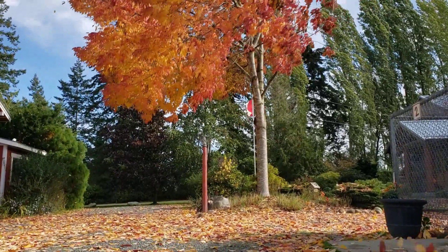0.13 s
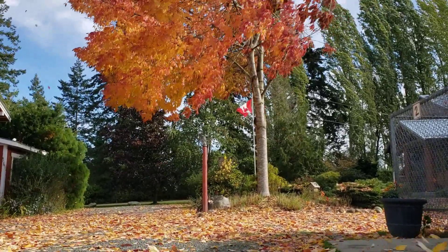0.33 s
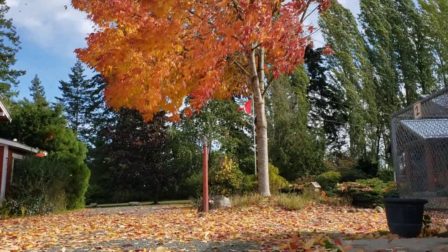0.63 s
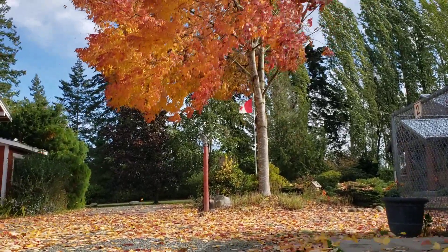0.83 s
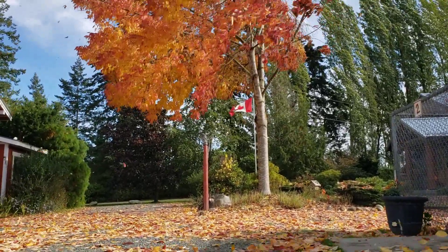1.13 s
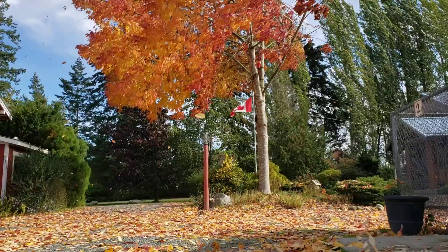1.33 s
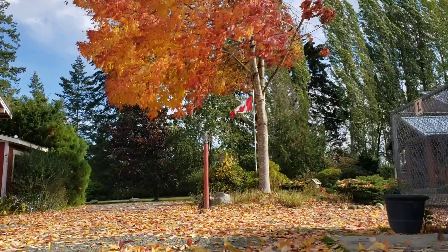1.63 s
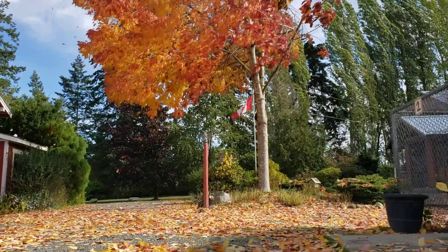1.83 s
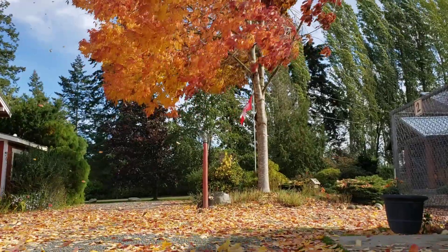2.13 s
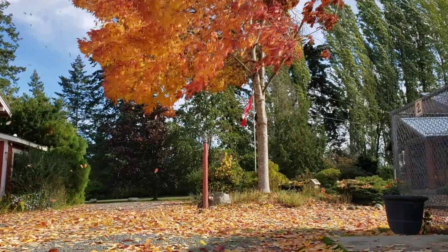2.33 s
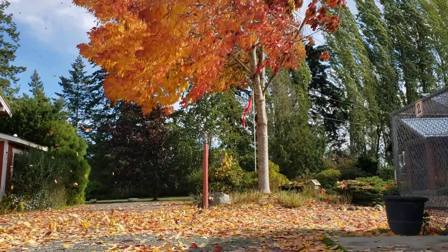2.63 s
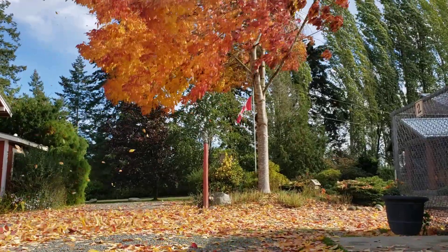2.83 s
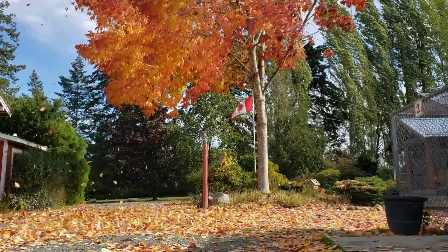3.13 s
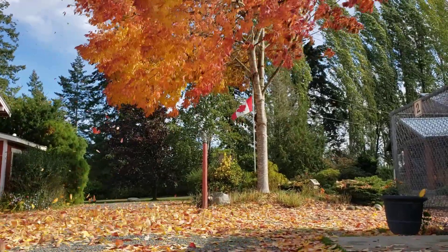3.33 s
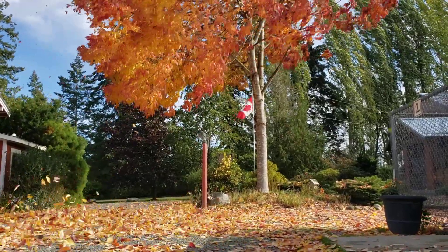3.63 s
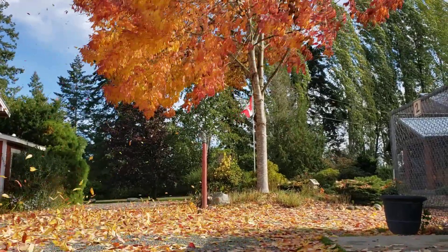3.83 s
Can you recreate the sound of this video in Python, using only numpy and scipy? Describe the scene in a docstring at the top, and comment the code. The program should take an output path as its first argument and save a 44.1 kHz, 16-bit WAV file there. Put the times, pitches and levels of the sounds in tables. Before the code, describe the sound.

Gusty wind buffets the microphone while trees hiss and dry fallen leaves skitter close by

```python
"""Trees hiss and roar, dry leaves skitter close by; wind rumbles, flutters and thumps, then dies away.
Trees: noise for the foliage over low noise for the crowns. Leaves: clumped crackles and single
ticks, both short filtered noise bursts, with a faint scatter from the yard.
Wind on the two microphone ports: low noise per port, brightening eddies and a few large shoves."""
import sys
import numpy as np
from scipy import signal
from scipy.fft import rfft, irfft
from scipy.io import wavfile
from scipy.ndimage import uniform_filter1d

SR = 44100
rng = np.random.default_rng(int(sys.argv[2]) if len(sys.argv) > 2 else 0)


def transcribe(u):
    """Save the signal u as a 16-bit wav file named by the first command-line argument.

    u: samples, shape (n,) or (channels, n), limited to [-1, 1]; the rate is SR.
    q: integer samples, one column per channel.
    """
    v = np.clip(np.atleast_2d(u).T, -1, 1)
    q = np.round(v * 32767).astype(np.int16)
    wavfile.write(sys.argv[1], SR, q)


N = 176400
HZ = np.fft.rfftfreq(N, 1 / SR)

# colour of dry leaves as heard through the microphone: (frequency [Hz], relative level [dB])
LEAF_COLOUR = [(200, -30), (800, 16), (1500, -5), (2400, 0), (3200, -3.5), (4100, 0), (5500, 0), (6700, -5),
               (7900, -13.5), (9000, -10), (10500, -5.5), (12200, -6.5), (13500, -5), (16000, -13.5)]
# colour of wind pressure on a port: (frequency [Hz], relative level [dB])
PRESSURE_COLOUR = [(15, -20), (30, -11.5), (50, 1.5), (80, 3), (125, -4), (160, -5), (210, -14),
                   (300, -18.5), (600, -31), (2000, -101)]


def amp(db):
    """Decibels to gain."""
    return 10 ** (np.asarray(db) / 20)


def unit(x):
    """Scales to rms 1."""
    return x / np.sqrt(np.mean(x ** 2) + 1e-20)


def curve(points, t=np.arange(N) / SR):
    """Reads a control curve in time."""
    return np.interp(t, *np.transpose(points))


def read(points, hz):
    """Reads a spectrum on a log-frequency axis."""
    f, value = np.transpose(points)
    return np.interp(np.log(hz + 1), np.log(f + 1), value)


def colour(x, spectrum):
    """Filters by a spectrum."""
    return irfft(rfft(x) * amp(read(spectrum, HZ)), N)


def drift(corner_hz):
    """Smooth random control of rms 1, rolling off around the corner."""
    lowpass = (HZ > 1) / (1 + (HZ / corner_hz) ** 4)
    return unit(irfft(rfft(rng.standard_normal(N)) * lowpass, N))


def add(mix, start_s, sound):
    """Adds a stereo sound at a time."""
    part = mix[:, max(round(start_s * SR), 0):][:, :sound.shape[1]]
    part += sound[:, :part.shape[1]]


def foliage_hiss(uneven_db=2.3, flicker_db=1.3):
    """Countless far leaves merge into a steady, slightly uneven hiss."""
    # (time [s], level [dB])
    hiss_level = [(0, -37), (.4, -42.5), (1, -42), (1.8, -40.5), (2.3, -43), (2.65, -47.5), (3.05, -44.5),
                  (3.5, -43.5), (4, -44)]
    # as heard through the microphone: (frequency [Hz], relative level [dB])
    hiss_colour = [(200, 6), (700, -20), (1400, -6.5), (2200, -2.5), (3200, -1), (4100, 2), (5300, 0.5),
                   (6600, -3), (7900, -11), (9000, -9.5), (10500, -5.5), (12000, -4.5), (13500, -11),
                   (16000, -17)]
    _, _, z = signal.stft(rng.standard_normal((2, N)), SR, nperseg=256)
    uneven = uniform_filter1d(rng.standard_normal(z.shape[1:]), size=4, axis=0)
    uneven = unit(uniform_filter1d(uneven, size=4, axis=1))
    hiss = signal.istft(z * amp(uneven_db * uneven), SR, nperseg=256)[1][:, :N]
    return unit(colour(hiss, hiss_colour)) * amp(curve(hiss_level) + flicker_db * drift(23))


def crown_roar():
    """The far crowns roar: low noise, more alike left and right in the bass."""
    # (time [s], level [dB])
    roar_level = [(0, -52), (2.6, -53), (3.1, -50), (4, -47.5)]
    # (frequency [Hz], relative level [dB])
    roar_colour = [(20, -9), (80, 7.5), (170, -3), (300, -0.5), (600, -1), (1000, -7.5), (1600, -5),
                   (3000, -7), (8000, -56)]
    # (frequency [Hz], left-right likeness [0-1])
    likeness = [(60, 1), (290, 0.94), (640, 0.8), (1400, 0.26), (3000, 0.27)]
    left, other = rfft(rng.standard_normal((2, N)))
    same = np.clip(read(likeness, HZ), -1, 1)
    right = same * left + np.sqrt(1 - same ** 2) * other
    roar = colour(irfft([left, right], N), roar_colour)
    return unit(roar) * amp(curve(roar_level))


def rumble(level, gain_db, lumps_db, steady=.65):
    """Low wind noise on one port, partly evened out, then made lumpy."""
    push = unit(colour(rng.standard_normal(N), PRESSURE_COLOUR))
    power = uniform_filter1d(push ** 2, size=2200) + 1e-6
    evened = push / power ** (steady / 2)
    return unit(evened * amp(lumps_db * drift(24.3))) * amp(curve(level) + gain_db)


def port_rumble():
    """Low wind noise, independent at each port; the recorder's wind suppression makes the left drop out."""
    # dropouts included: (time [s], level before gain [dB])
    left_level = [(0.0, -67), (0.09, -19), (0.11, -53), (0.15, -17), (0.22, -72), (0.29, -26), (0.37, -33),
                  (0.51, -14.5), (0.75, -37), (0.9, -24.5), (0.95, -59), (1.19, -67), (1.22, -46),
                  (1.4, -25), (1.52, -80), (1.57, -15), (1.64, -70), (1.77, -38), (1.86, -66),
                  (2.01, -27.5), (2.11, -29), (2.25, -31), (2.42, -24), (2.49, -36), (2.52, -66),
                  (2.58, -27.5), (2.68, -75), (2.74, -52), (2.78, -58), (2.82, -28), (2.89, -30.5),
                  (2.96, -61), (3.09, -31), (3.26, -62), (3.49, -38.5), (3.54, -59), (3.76, -43),
                  (4.0, -54)]
    # (time [s], level before gain [dB])
    right_level = [(0.0, -30.5), (0.09, -17), (0.21, -24.5), (0.29, -8.5), (0.36, -24), (0.47, -16.5),
                   (0.59, -21.5), (0.65, -22), (0.73, -27.5), (0.87, -23.5), (0.94, -32), (1.17, -29),
                   (1.21, -24.5), (1.5, -38), (1.68, -27), (1.9, -36.5), (2.14, -30.5), (2.17, -58),
                   (2.25, -23.5), (2.36, -44), (2.43, -21.5), (2.68, -43.5), (2.77, -22), (3.15, -41),
                   (3.19, -56), (4.0, -52)]
    left = rumble(left_level, gain_db=-4.0, lumps_db=0.8)
    right = rumble(right_level, gain_db=-2.5, lumps_db=1.2)
    return np.array([left, right])


def buffet(steady=0.62, patchy_db=4.0):
    """Eddies flutter on both ports, each with its own brightness; harder ones reach higher."""
    # force of the eddies: (time [s], level before gain [dB])
    force = [(0, -40.5), (.05, -43.5), (.08, -29.5), (.115, -39), (.22, -35.5), (.25, -29.5), (.315, -25.5),
             (.36, -31.5), (.382, -20), (.41, -33.5), (.47, -26), (.53, -29.5), (.62, -34.5), (.66, -32.5),
             (.72, -38), (.8, -39), (.855, -33), (.94, -50.5), (.98, -39), (1.08, -50.5), (1.2, -36),
             (1.245, -37), (1.3, -48.5), (1.41, -41), (1.49, -59), (1.6, -42.5), (1.68, -35.5), (1.72, -45),
             (1.765, -34.5), (1.85, -46), (1.92, -61), (1.96, -36.5), (2.02, -51), (2.065, -35.5),
             (2.12, -41.5), (2.22, -37), (2.26, -41.5), (2.35, -37.5), (2.4, -27), (2.44, -33.5),
             (2.475, -34), (2.52, -43), (2.57, -41.5), (2.63, -78), (2.7, -54), (2.735, -36.5),
             (2.81, -34.5), (2.94, -57), (3.2, -79), (4, -82)]
    # at middling force: (frequency [Hz], relative level [dB])
    eddy_colour = [(30, -62), (100, -7), (170, 2), (320, 0), (480, -2), (700, -16), (1000, -20),
                   (1600, -30), (4000, -67), (12000, -95)]
    middling_db, octaves_per_db = -30.5, 0.07
    gain_db, left_db = 2, .8  # the right port gets -left_db
    flutter_db, flutter_hz, flutter_octaves = 3.1, 44.7, .2
    frames = dict(nperseg=512, noverlap=384)

    hz, t, z = signal.stft(rng.standard_normal((2, N)), SR, **frames)
    flutter = np.array([drift(flutter_hz), drift(flutter_hz)])
    frame_index = np.minimum(np.round(t * SR).astype(int), N - 1)
    eddies = flutter[:, None, frame_index]
    octaves_up = octaves_per_db * (curve(force, t) - middling_db) + flutter_octaves * eddies
    patches = uniform_filter1d(rng.standard_normal(z.shape), size=4, axis=1)
    patches = unit(uniform_filter1d(patches, size=7, axis=2))
    shape = amp(read(eddy_colour, hz[:, None] / 2 ** octaves_up) + patchy_db * patches)
    shape /= np.linalg.norm(shape, axis=1, keepdims=True)  # brightness leaves frame power alone
    air = signal.istft(z * shape, SR, **frames)[1][:, :N]
    air = unit(air * amp(flutter_db * flutter))
    power = uniform_filter1d(air ** 2, size=1300) + 1e-6
    air = unit(air / power ** (steady / 2))
    return air * amp(curve(force) + gain_db + np.array([[left_db], [-left_db]]))


def snap(hz, ring_s, octaves, scrape_db, crack=0., size=1024):
    """A dry leaf is struck: a crack, a quick broad ring and a faint scrape, different at each port."""
    scrape_s = 0.0066
    t, f = np.arange(size) / SR, np.fft.rfftfreq(size, 1 / SR)
    decay = np.exp(-t / ring_s) + amp(scrape_db) * np.exp(-t / scrape_s)
    burst = rng.standard_normal((2, size)) * decay
    burst[:, 0] += crack
    shape = np.exp(-.5 * (np.log2((f + 1) / hz) / octaves) ** 2)
    late = np.roll(burst, size // 64, axis=1)  # room for the filter's pre-ring
    return irfft(rfft(late) * shape)


def skitter(shared_db=3.8, scrape_db=-24, crack=1.7, count=56):
    """Tumbling leaves crackle in clumps, each with its own pitch and direction."""
    # (time [s], level [dB])
    skitter_level = [(0, -42.5), (.3, -42.5), (.42, -45), (.65, -46), (.92, -44.5), (1.01, -39.5),
                     (1.08, -45.5), (1.27, -40.5), (1.52, -49), (1.8, -42), (1.95, -54), (2.15, -45.5),
                     (2.6, -50), (3.1, -61.5), (4, -48)]
    crackles_per_s = 3000  # over all leaves
    size_spread_db, size_cap = 4.5, 5.6  # cap in multiples of the spread
    clump_db, clump_hz = 2.5, 44.4
    ring_median_s, width_octaves, max_delay_s = 0.0021, .33, .0004
    out = np.zeros((2, N))
    shared = shared_db * np.tanh(drift(clump_hz))
    for hz in np.geomspace(1200, 14000, count):
        clumps = clump_db * np.tanh(drift(clump_hz)) + shared
        sizes_db = size_spread_db * np.minimum(rng.exponential(1, N), size_cap)
        struck = rng.random(N) < crackles_per_s / count / SR
        hits = amp(sizes_db + clumps) * struck
        ring_s = ring_median_s * np.exp2(rng.standard_normal() / 2)
        grain = unit(snap(hz, ring_s, width_octaves, scrape_db, crack)) * np.sqrt(hz)
        delay_s = rng.uniform(-1, 1) * max_delay_s
        grain[1] = np.roll(grain[1], round(delay_s * SR))
        out += signal.oaconvolve(hits[None], grain, axes=1)[:, :N]
    return unit(colour(out, LEAF_COLOUR)) * amp(curve(skitter_level))


def ticks(gain_db=0, crack=5.9):
    """The nearest leaves hit the paving one at a time."""
    # before leaf colour: (time [s], strength [dB], centre [Hz], ring [s])
    strikes = [(.0325, -3, 4600, 0.0016), (.3005, -1.5, 6940, .0015), (.443, -12.5, 1780, 0.0017),
               (.603, -15.5, 4000, .0015), (.7445, -12, 2200, 0.00077), (.842, -13, 3980, 0.0023),
               (0.981, -16.5, 1390, 0.0027), (1.002, -10, 2610, 0.0047), (1.0163, -3, 3900, 0.0007),
               (1.025, -10, 5930, 0.0025), (1.1068, -8.5, 3030, 0.00089), (1.1325, -9.5, 3800, 0.0035),
               (1.247, -8.5, 4500, 0.0035), (1.274, -8, 4460, .0012), (1.3195, -9, 3140, 0.00066),
               (1.4965, -3, 11700, .001), (1.597, -12, 4340, 0.00086), (1.6245, -10.5, 5000, .001),
               (1.837, -4.5, 7200, .003), (1.8815, -13.5, 2300, 0.002), (1.9273, -2.5, 11000, .001),
               (1.9345, -5, 11200, 0.00045), (1.9812, -9.5, 6000, 0.00045), (2.086, -4.5, 10700, .002),
               (2.743, -5, 10100, 0.00091), (2.7452, -12.5, 3870, .002), (2.7461, -1, 10200, 0.00062)]
    width_octaves, scrape_db = 0.78, -3
    out = np.zeros((2, N))
    for start_s, db, hz, ring_s in strikes:
        sound = snap(hz, ring_s, width_octaves, scrape_db, crack)
        sound /= np.linalg.norm(sound, axis=1, keepdims=True)
        add(out, start_s, amp(db + gain_db) * sound)
    return colour(out, LEAF_COLOUR)


def yard(x, size=8000):
    """Short, faint scatter from the ground and the sheds: a decaying noise tail."""
    scatter_db, t60_s = -24.5, 0.16
    tail = rng.standard_normal((2, size)) * amp(-60 * np.arange(size) / SR / t60_s)
    tail /= np.linalg.norm(tail[0])
    return x + amp(scatter_db) * signal.fftconvolve(x, tail, axes=1)[:, :N]


def thumps(gain_db=-4):
    """A large eddy shoves one port more than the other: a few lurches of pressure."""
    # (time [s], strength before gain [dB], pan [-1 left to 1 right])
    shoves = [(0.091, -14, .7), (0.287, -10.5, 0.75), (0.859, -14.5, 0.87), (1.575, -22.5, -0.2),
              (1.67, -20.5, 1), (2.43, -19, .3)]
    sigma_s = 0.009
    out, t = np.zeros((2, N)), np.arange(N) / SR
    push = colour(rng.standard_normal(N), PRESSURE_COLOUR)
    for centre_s, db, pan in shoves:
        swell = np.exp(-.5 * ((t - centre_s) / sigma_s) ** 2)
        shove = push * swell
        shove *= np.linalg.norm(swell) / np.linalg.norm(shove)
        angle = (np.clip(pan, -1, 1) + 1) * np.pi / 4
        out += np.outer([np.cos(angle), np.sin(angle)], amp(db + gain_db) * shove)
    return out


def scene():
    """Trees, near leaves and wind on the microphone."""
    trees = foliage_hiss() + crown_roar()
    leaves = yard(skitter() + ticks())
    wind = port_rumble() + buffet() + thumps()
    return trees + leaves + wind


def record(dry):
    """The recorder's band limit: a linear-phase low-pass."""
    edge_hz = 15950
    lowpass = signal.firwin(511, edge_hz, window=("kaiser", 9), fs=SR)
    return signal.oaconvolve(dry, lowpass[None], "same")


dry = scene()
out = record(dry)
transcribe(out)
```